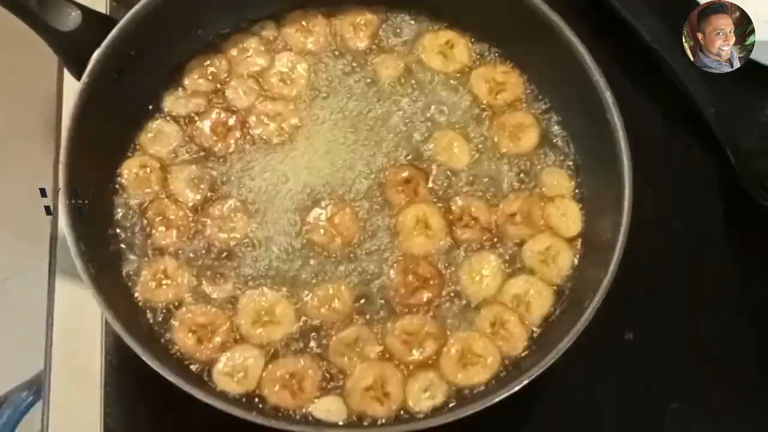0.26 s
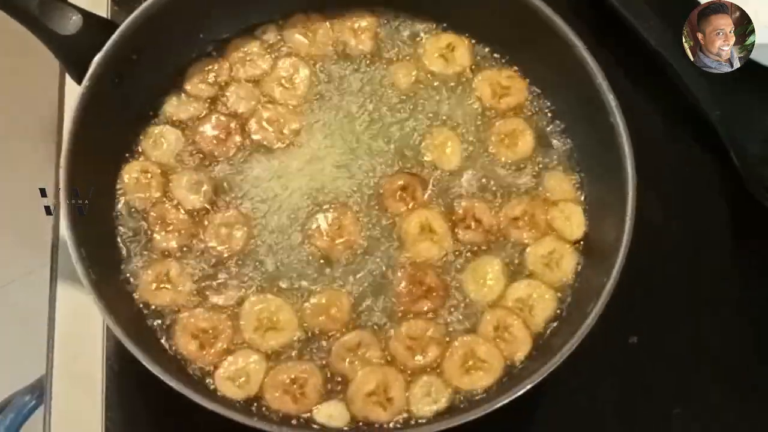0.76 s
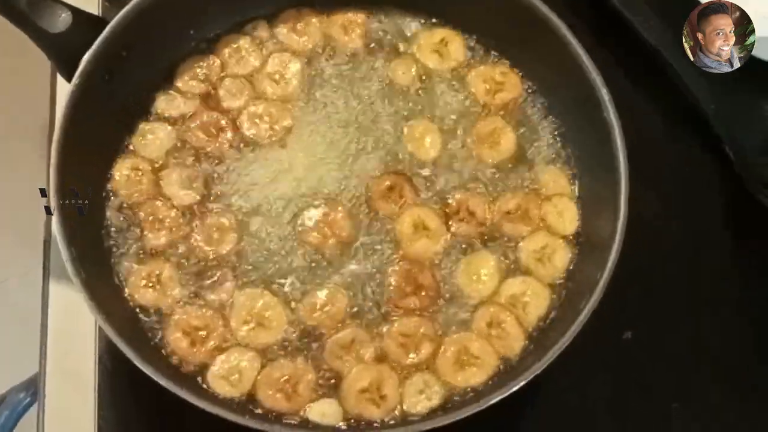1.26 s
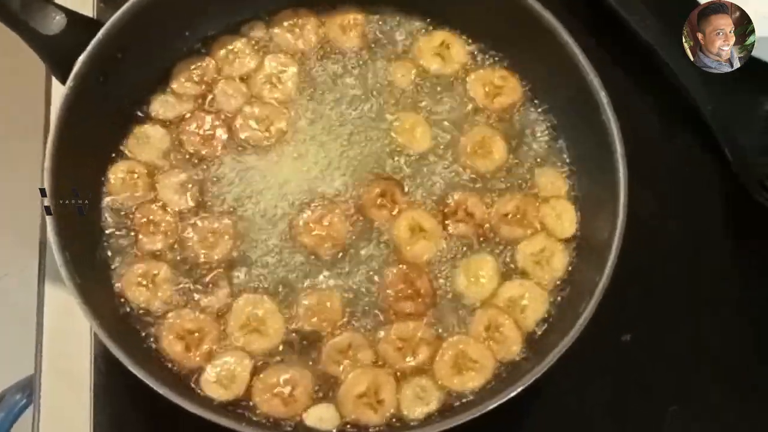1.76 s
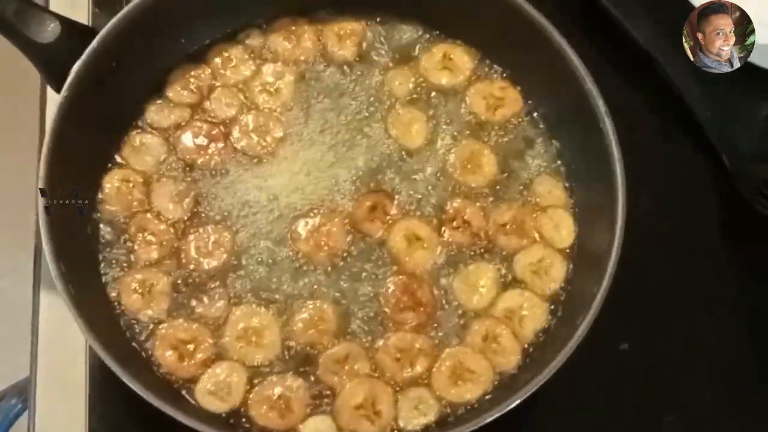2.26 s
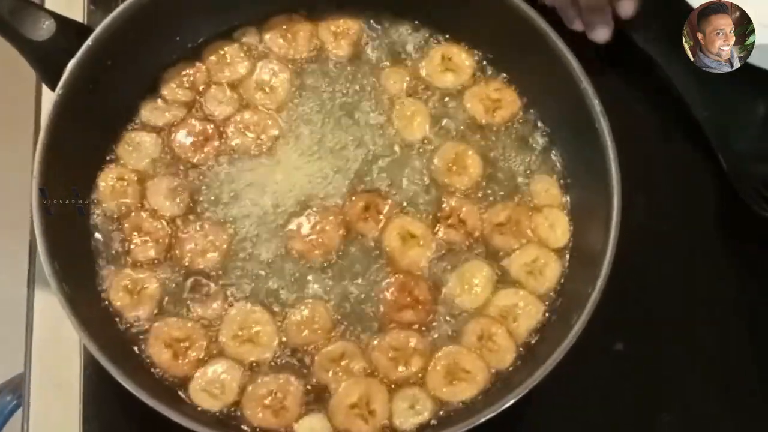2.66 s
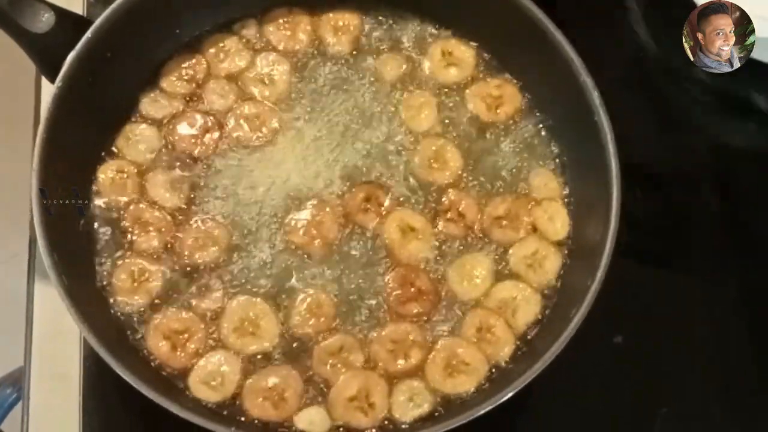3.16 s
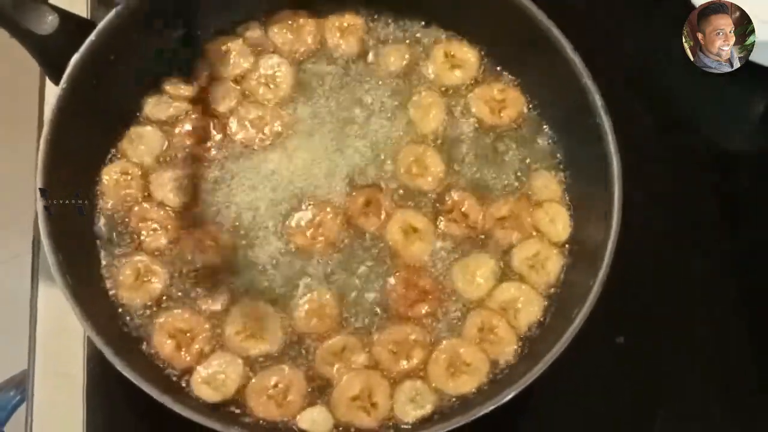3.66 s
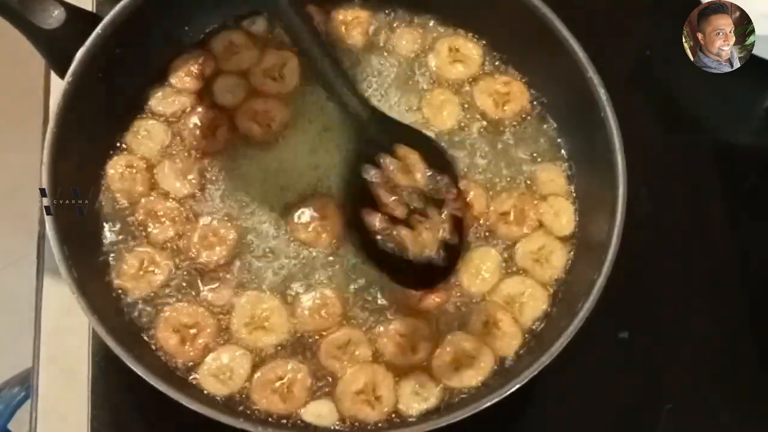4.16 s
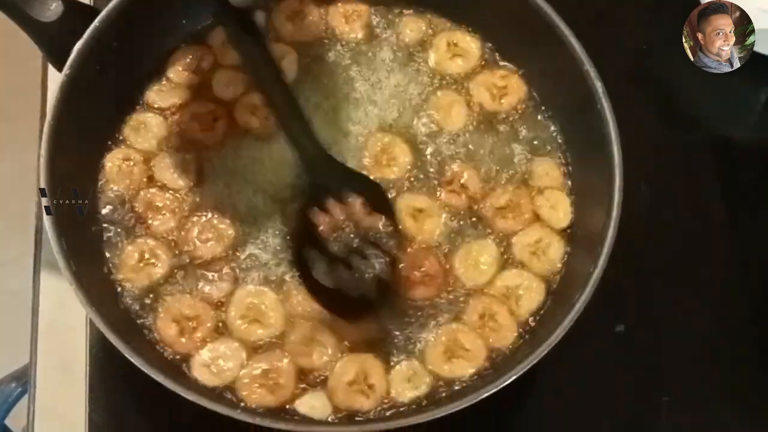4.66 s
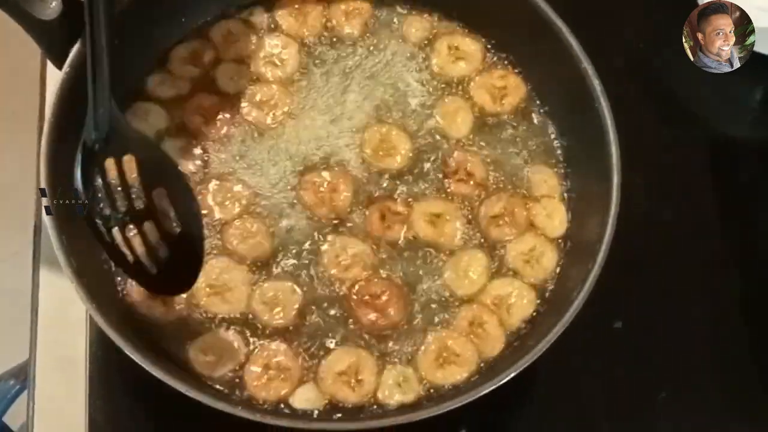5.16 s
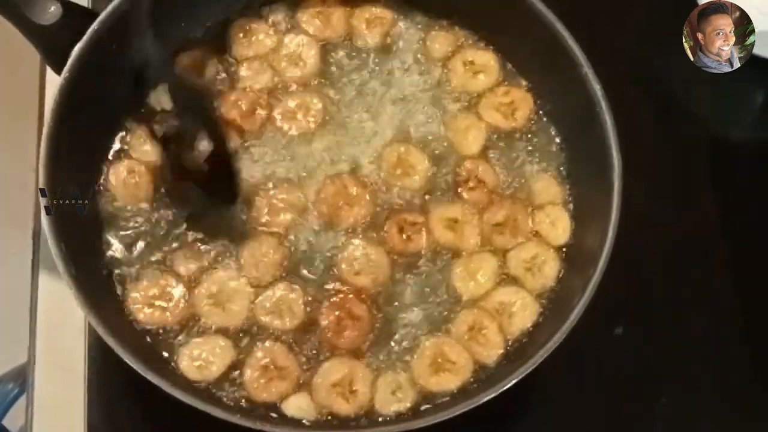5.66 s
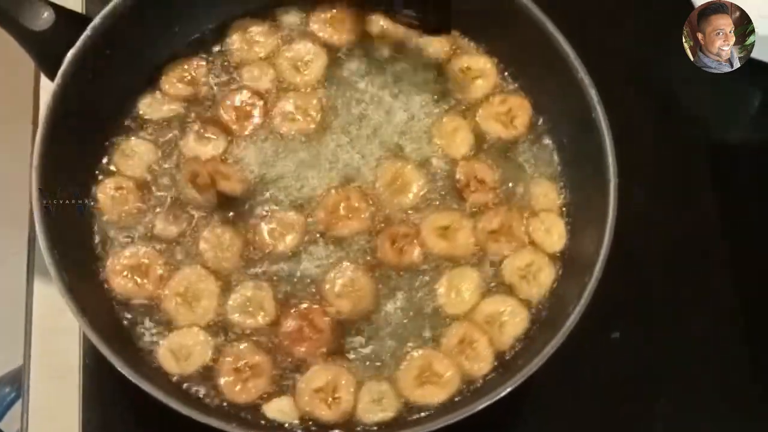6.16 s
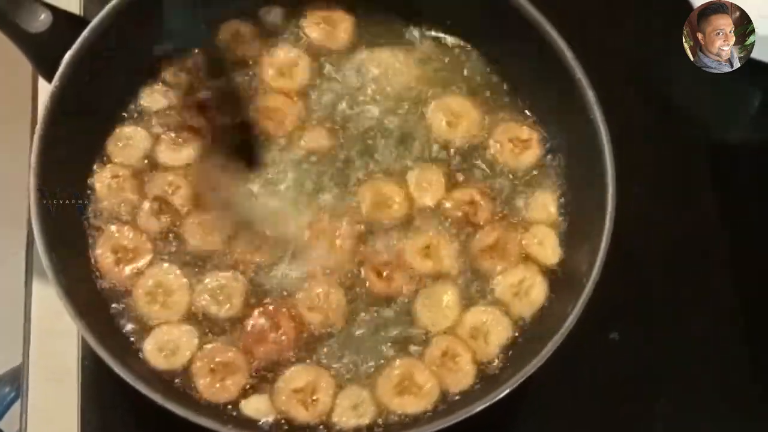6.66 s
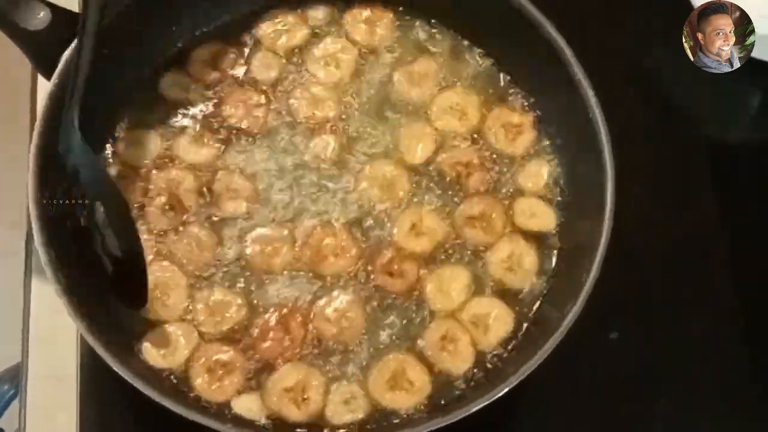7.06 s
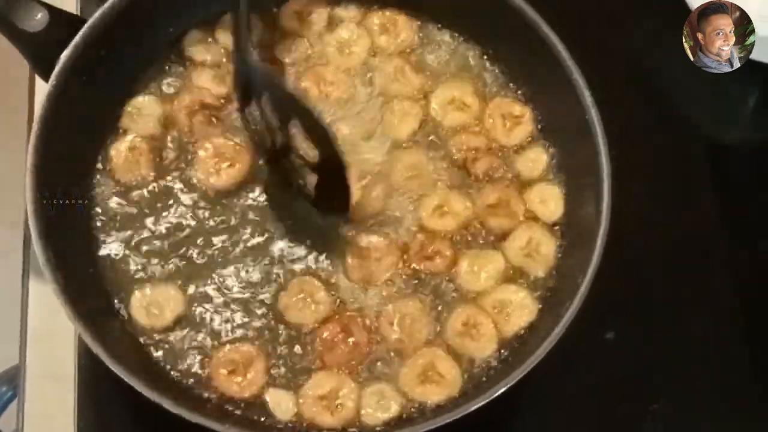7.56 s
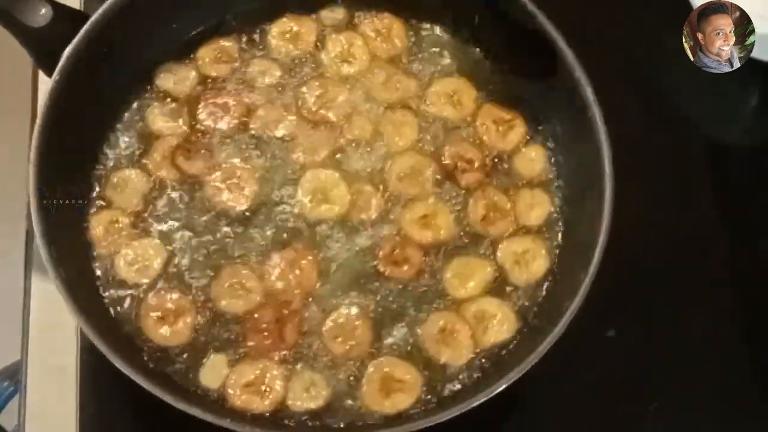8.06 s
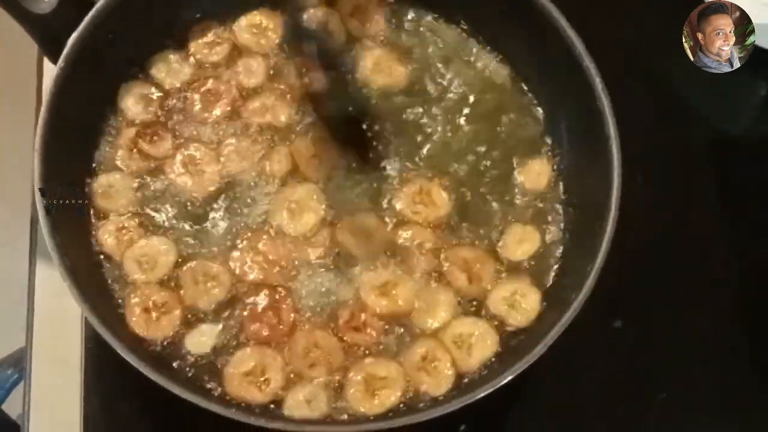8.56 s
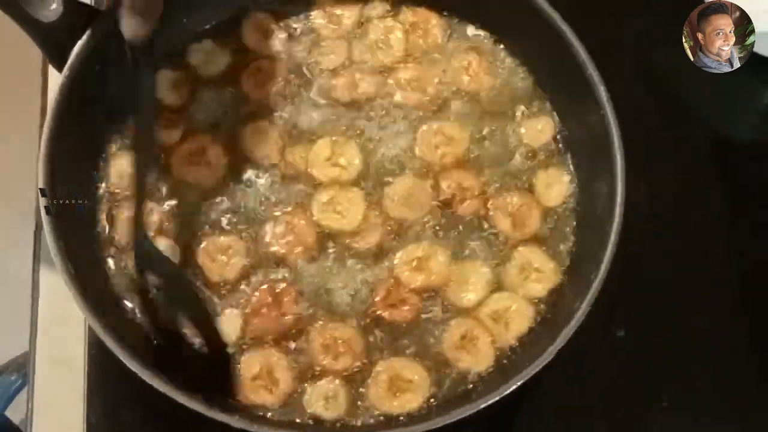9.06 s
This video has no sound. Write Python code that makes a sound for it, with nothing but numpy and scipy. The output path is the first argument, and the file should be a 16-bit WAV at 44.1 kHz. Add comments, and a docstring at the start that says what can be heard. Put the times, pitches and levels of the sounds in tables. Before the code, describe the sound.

Hot oil fizzes and bubbles around frying banana slices, heard close up, with scattered snaps and pops.

```python
"""A short, dull burst of frying breaks off, then a brighter sizzle fades in: banana slices in hot oil,
heard from just above the pan in a small, murmuring kitchen. Steam bubbles burst by the thousand: big
ones simmer, middling ones crackle, the finest fizz, and the pan rings under them. Droplets snap, water
spits and steam pockets plop. A faint drone dies away early; the sizzle eases as a spoon stirs."""
import sys
import numpy as np
from scipy import signal
from scipy.fft import rfft, irfft
from scipy.io import wavfile
from scipy.ndimage import map_coordinates

SR = 44100
rng = np.random.default_rng(int(sys.argv[2]) if len(sys.argv) > 2 else 0)


def file_out(sig):
    """Save sig as 16-bit WAV at sys.argv[1]."""
    # one column per channel
    cols = np.atleast_2d(sig).T
    # limit, then scale
    lim = np.clip(cols, -1, 1)
    pcm = np.round(lim * 32767).astype(np.int16)
    wavfile.write(sys.argv[1], SR, pcm)


N = 411012


def undb(db):
    """Decibels to gain."""
    return 10 ** (np.asarray(db) / 20)


def unit(x):
    """Scale to rms 1."""
    return x / np.sqrt(np.mean(x ** 2))


def add(out, start_s, sound):
    """Mix a sound into out."""
    i = int(start_s * SR)
    out[i:i + len(sound)] += sound[:max(len(out) - i, 0)]


def colour(x, spectrum, size=4096):
    """Causal filter through (Hz, dB) points, so each click rings after its attack; rms 1."""
    hz, db = np.transpose(spectrum)
    bins_hz = np.maximum(np.arange(size // 2 + 1) * SR / size, 1)
    gain = undb(np.interp(np.log(bins_hz), np.log(hz), db))
    cepstrum = irfft(np.log(gain))
    cepstrum[1:size // 2] *= 2  # fold to minimum phase
    cepstrum[size // 2 + 1:] = 0
    impulse = irfft(np.exp(rfft(cepstrum)))
    return unit(signal.fftconvolve(x, impulse)[:N])


def ring(x, hz, t60_s):
    """One resonance driven by x; rms 1."""
    pole = np.exp((2j * np.pi * hz - np.log(1000) / t60_s) / SR)
    return unit(signal.lfilter([1, 0, -1], [1, -2 * pole.real, abs(pole) ** 2], x))


def wander(rate_hz):
    """Smooth random drift; rms 1."""
    steps = rng.standard_normal(2048)
    return unit(map_coordinates(steps, [np.arange(N) / SR * rate_hz], order=3, mode="wrap"))


def bursts(per_s, spread_db):
    """Bubble skins tear in random clicks: many small, a few large; rms 1."""
    happens = rng.random(N) < per_s / SR
    size = undb(spread_db * np.minimum(rng.standard_exponential(N), 4.3))
    return unit(happens * size * rng.choice([-1, 1], N))


def bubbles(low_hz, high_hz, cycles, glide, spread_db, count):
    """Bubbles swell, ring and rise in pitch as they surface; rms 1."""
    out = np.zeros(N)
    for when, pitch, size, life in rng.random((count, 4)):
        hz = low_hz * (high_hz / low_hz) ** pitch
        age = np.arange(0, 1, hz / (SR * cycles * (.5 + life)))
        life_s = len(age) / SR
        tone = np.sin(2 * np.pi * hz * life_s * age * (1 + glide * age / 2))
        swell = age * np.exp(-8 * age)
        size_db = spread_db * min(-np.log(size), 4)
        add(out, when * N / SR, tone * swell * undb(size_db))
    return unit(out)


# Dull frying spectrum: (frequency [Hz], level [dB])
DULL_SPECTRUM = [(88, -80), (150, -40), (289, -30), (567, -28), (612, -25), (818, -20), (1730, -12),
                 (2100, -8), (2270, -5.5), (2860, -2.5), (3540, -11.5), (4540, -34.5), (9630, -37),
                 (15000, -67)]


def dull_frying(t, level_db=-18, end_s=0.151, fade_s=0.008):
    """Bubble bursts with little treble, breaking off."""
    fade_out = np.clip((end_s - t) / fade_s, 0, 1)
    return colour(bursts(per_s=8400, spread_db=0.5), DULL_SPECTRUM) * undb(level_db) * fade_out


# Crackle spectrum, coloured by a microphone or pan resonance near 2.4 kHz: (frequency [Hz], level [dB])
CRACKLE_SPECTRUM = [(50, -81), (300, -46), (900, -29), (1550, -18), (1880, -10.5), (2100, -5), (2380, -0.5),
                    (2800, -6.5), (3300, -9.5), (3850, -11), (4400, -17), (5100, -29.5), (7400, -33),
                    (15000, -49)]


def crackle(skins, spurts_db, dried_s):
    """Middling bubbles burst round the slices; they shrink with drying, ringing higher and faster."""
    pops = bubbles(1704, 4314, cycles=22, glide=0.03, spread_db=2.5, count=6000)
    sound = colour(skins + undb(-10.5) * pops, CRACKLE_SPECTRUM) * undb(spurts_db)
    pitch_ratio = 0.99 + 0.005 * dried_s
    return map_coordinates(sound, [np.cumsum(pitch_ratio)], order=3, mode="wrap")


# Fizz spectrum, coloured by a sharp microphone resonance near 7.5 kHz: (frequency [Hz], level [dB])
FIZZ_SPECTRUM = [(100, -57), (2500, -32), (4200, -12.5), (5200, -24), (6000, -14), (6800, -8.5), (7200, -1),
                 (7480, 1.5), (7900, -5.5), (8500, -11.5), (9300, -13), (10500, -19.5), (12000, -26.5),
                 (15500, -38)]


def fizz(spray, spurts_db):
    """Fine bubbles click and ping."""
    pings = bubbles(5474, 10500, cycles=32, glide=0.02, spread_db=2.5, count=5000)
    flicker_db = 0.5 * spurts_db + 0.7 * wander(rate_hz=41)
    return colour(spray + undb(-12.5) * pings, FIZZ_SPECTRUM) * undb(flicker_db)


# Mist spectrum: (frequency [Hz], level [dB])
MIST_SPECTRUM = [(100, -55), (4000, -25), (8000, -7), (10800, 4.5), (12000, -0.5), (13000, 3.5),
                 (15500, -1)]


def mist(spray):
    """The finest bubbles burst in a high, flickering hiss."""
    clicks = bursts(per_s=14000, spread_db=3.5) + undb(-11) * spray
    return colour(clicks, MIST_SPECTRUM) * undb(1.2 * wander(rate_hz=44))


# Simmer spectrum: (frequency [Hz], level [dB])
SIMMER_SPECTRUM = [(40, -43), (150, -31), (235, -29.5), (340, -9), (500, -10), (600, -14.5), (830, -7),
                   (950, -2.5), (1150, 3.5), (1400, 3.5), (1650, 0), (2100, -31.5)]


def simmer(skins, spurts_db):
    """Large, slow cavities ring low and long."""
    cavities = bubbles(506.4, 1595, cycles=21.4, glide=0.1, spread_db=3, count=2400)
    flicker_db = spurts_db + 0.67 * wander(rate_hz=11)
    return colour(skins + undb(-11) * cavities, SIMMER_SPECTRUM) * undb(flicker_db)


# Pan modes: (frequency [Hz], t60 [s], level re simmer [dB])
PAN_RESONANCES = [(295.4, 0.056, -20.5), (424.4, 0.12, -21.5), (467, 0.084, -24), (679, 0.051, -22),
                  (766, 0.066, -20), (888, 0.055, -27.5), (1139, 0.051, -17.5), (1893, 0.073, -2),
                  (2166, 0.033, 0.5)]


def pan(skins):
    """The pan rings under the rain of bursts."""
    return sum(ring(skins, hz, t60_s) * undb(db) for hz, t60_s, db in PAN_RESONANCES)


# Boil strength, slackening once the slices are turned: (time [s], level [dB])
BOIL_LEVELS = [(0.5, 0), (1.0, 0), (1.7, -1), (2.7, 0.2), (3.2, -0.4), (4.1, 0.05), (5.6, -0.2), (6.5, 0),
               (7.4, -1.04), (8.0, -3), (8.6, -3), (9.3, -2.5)]


def sizzle(t, dry_at_s=6.3):
    """Steam spurts out with the boil and the spoon, in ever finer bubbles as the slices dry."""
    boil_db = np.interp(t, *np.transpose(BOIL_LEVELS))
    dried_s = np.minimum(t, dry_at_s)
    stir_crackle_db, stir_fizz_db, stir_mist_db = stirring(t)
    crackle_db = -20 - 0.1538 * dried_s + boil_db + stir_crackle_db
    fizz_db = -32 + 0.7126 * dried_s + boil_db + stir_fizz_db
    mist_db = -46 + 1.02 * dried_s + 0.7 * boil_db + stir_mist_db
    simmer_db = -33.5 - 0.9 * dried_s + 0.57 * boil_db
    spurts_db = 0.46 * wander(rate_hz=26)
    skins = bursts(per_s=7500, spread_db=2.2)
    out = crackle(skins, spurts_db, dried_s) * undb(crackle_db)
    # each tearing skin also throws a spray of the finest bubbles
    spray = bursts(per_s=16000, spread_db=1) + undb(-13.5) * skins
    out += fizz(spray, spurts_db) * undb(fizz_db)
    out += mist(spray) * undb(mist_db)
    return out + (simmer(skins, spurts_db) + pan(skins)) * undb(simmer_db)


def drone(t, hz=415, t60_s=0.076, level_db=-52.5, hold_s=2.1, fall_db_per_s=30):
    """A faint wavering tone early in the boil, dying away."""
    tone = ring(ring(rng.standard_normal(N), hz, t60_s), hz, t60_s)
    return tone * undb(level_db - fall_db_per_s * np.maximum(t - hold_s, 0))


# Room noise spectrum: (frequency [Hz], level [dB])
KITCHEN_SPECTRUM = [(20, -25), (45, -22), (62, -12), (80, -8), (100, 0), (150, 1), (280, -2.5), (600, -5),
                    (2000, -56)]


def kitchen(t, start_db=-62, rise_db_per_s=0.81):
    """Low room murmur, slowly rising."""
    return colour(rng.standard_normal(N), KITCHEN_SPECTRUM) * undb(start_db + rise_db_per_s * t)


# Droplet snaps: (time [s], peak [dB])
DROPLET_SNAPS = [(0.7827, -25), (2.6625, -19), (8.2868, -17)]


def snaps(decay_s=0.0004):
    """Droplets thrown from the oil give short, bright cracks."""
    out, t = np.zeros(N), np.arange(SR // 200) / SR
    for start_s, peak_db in DROPLET_SNAPS:
        crack = np.diff(rng.standard_normal(len(t) + 1)) * np.exp(-t / decay_s)
        add(out, start_s, crack / np.abs(crack).max() * undb(peak_db))
    return out


# Spitting water drops: (time [s], relative peak [dB], pitch [Hz])
WATER_SPITS = [(0.8664, -10, 2400), (1.1114, -8, 2480), (1.8961, -8, 2170), (1.9759, -6, 2180),
               (2.7976, -4, 2320), (4.3116, -6, 2400), (4.8519, -8, 2360), (5.1174, -7, 2440),
               (5.7688, -8, 2500), (5.8446, -7, 2440), (5.9579, -6, 2380), (8.4307, -12, 2540),
               (8.6343, -6, 2370), (8.7306, -7, 2200), (8.77, -9, 2620), (8.8513, -11, 1980)]
# Big steam pockets: (time [s], relative peak [dB], pitch [Hz])
STEAM_PLOPS = [(3.09, -20, 1280), (3.3054, -21, 1290), (3.8377, -19, 1290), (4.0207, -22.5, 1126),
               (5.025, -20, 1250), (7.2838, -25.5, 1140), (7.3911, -24, 1140), (7.9199, -22, 1340),
               (9.0544, -25.5, 1140), (9.181, -25, 1280)]


def steam_pockets(rows, swell_s, ring_s, gain_db):
    """Water flashes to steam: its cavity swells, rings for a few milliseconds and collapses."""
    out, t = np.zeros(N), np.arange(SR // 25) / SR
    for start_s, peak_db, hz in rows:
        envelope = (1 - np.exp(-t / swell_s)) * np.exp(-t / ring_s)
        pop = np.sin(2 * np.pi * hz * t) * envelope
        add(out, start_s, pop / np.abs(pop).max() * undb(peak_db + gain_db))
    return out


# Spoon strokes: (centre [s], length [s], crackle [dB], fizz [dB], mist [dB])
SPOON_STROKES = [(5.25, 0.89, -1.5, 0.5, 2), (6.3, 0.35, -0.5, 1.3, -2), (6.858, 0.68, -2.5, -2, 3.5),
                 (7.74, 0.53, -1.5, -4.5, -1.5), (8.42, 0.27, 1.2, 1, 1), (9.3, 0.3, -2, -2, -2)]


def stirring(t):
    """Strokes smother the bubbles or wet the slices afresh: dB offsets for crackle, fizz and mist."""
    offsets_db = np.zeros((3, N))
    for centre_s, length_s, *layers_db in SPOON_STROKES:
        position = np.clip((t - centre_s) / length_s, -.5, .5)
        offsets_db += np.outer(layers_db, np.cos(np.pi * position) ** 2)
    return offsets_db


def walls(x, t60_s, wet_db):
    """Hob and kitchen walls return a short diffuse tail."""
    t = np.arange(SR // 2) / SR
    tail = rng.standard_normal(len(t)) * np.exp(-np.log(1000) * t / t60_s) * (t > .003)
    wet = signal.fftconvolve(x, tail / np.linalg.norm(tail))[:N]
    return (x + undb(wet_db) * wet) / np.hypot(1, undb(wet_db))


def scene(sizzle_start_s=0.207, fade_s=0.29):
    """Dull frying, a moment of silence, then the long sizzle fading in."""
    t = np.arange(N) / SR
    spits = steam_pockets(WATER_SPITS, swell_s=0.00058, ring_s=0.0023, gain_db=-3.5)
    plops = steam_pockets(STEAM_PLOPS, swell_s=0.00089, ring_s=0.004, gain_db=-2.5)
    frying = walls(sizzle(t) + snaps() + spits + plops, t60_s=0.21, wet_db=-10)
    background = drone(t) + kitchen(t)
    fade_in = np.clip((t - sizzle_start_s) / fade_s, 0, 1)
    return (dull_frying(t) + (frying + background) * fade_in)[None]


def record(dry):
    """Steep low-pass on the top of the treble."""
    cutoff_hz = 15400
    return signal.sosfilt(signal.ellip(10, .2, 70, cutoff_hz, fs=SR, output="sos"), dry)


dry = scene()
out = record(dry)
file_out(out)
```